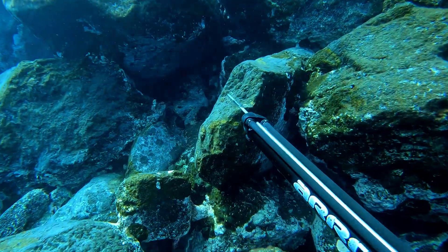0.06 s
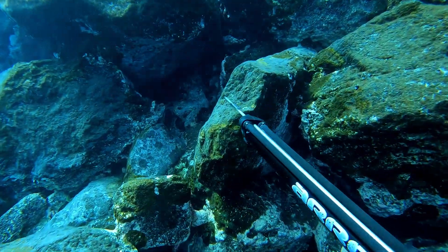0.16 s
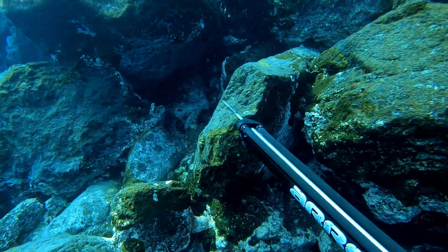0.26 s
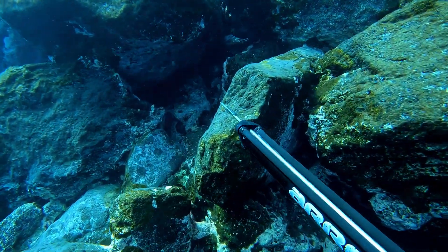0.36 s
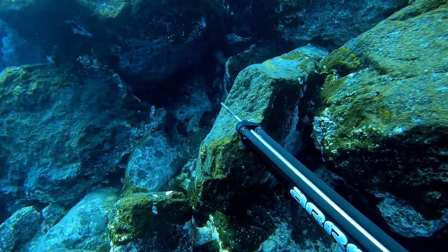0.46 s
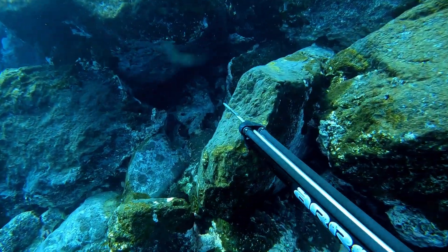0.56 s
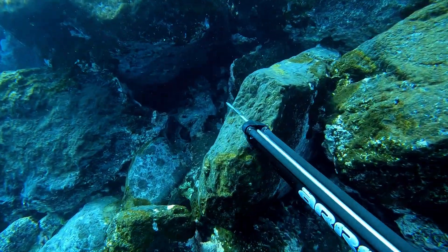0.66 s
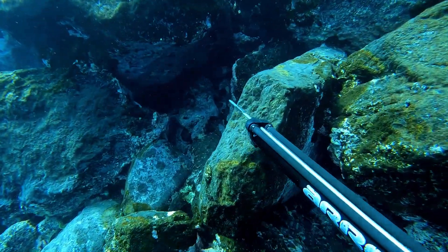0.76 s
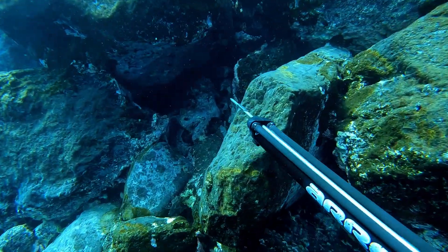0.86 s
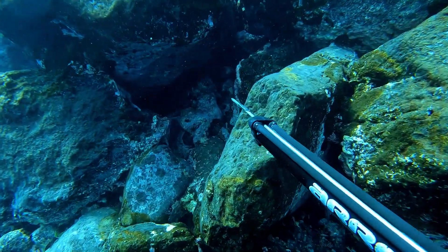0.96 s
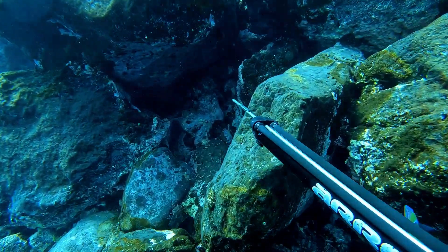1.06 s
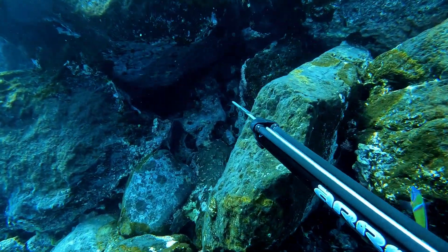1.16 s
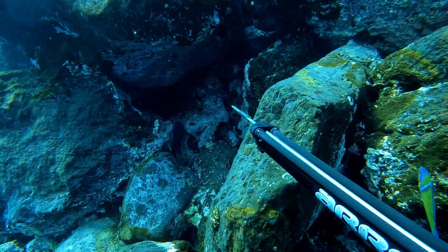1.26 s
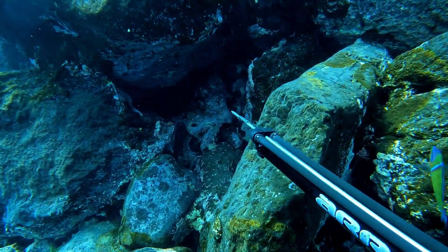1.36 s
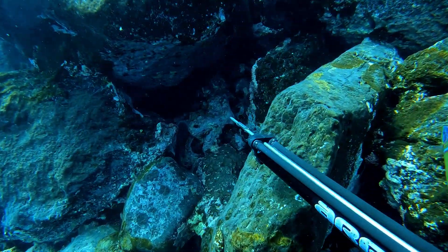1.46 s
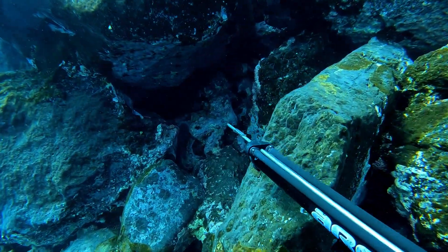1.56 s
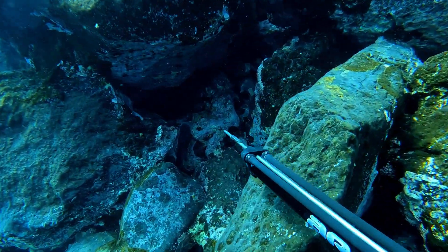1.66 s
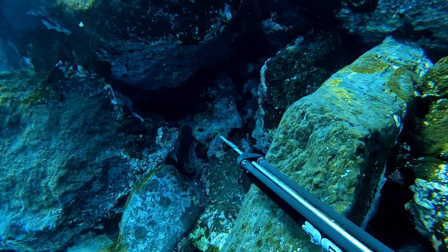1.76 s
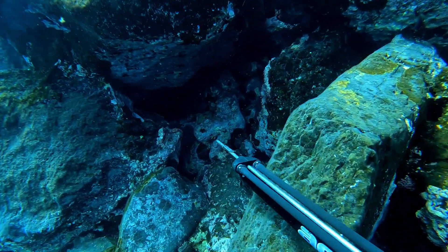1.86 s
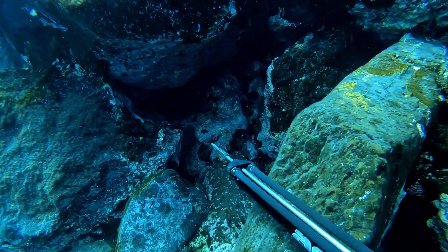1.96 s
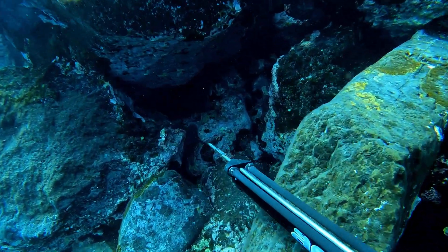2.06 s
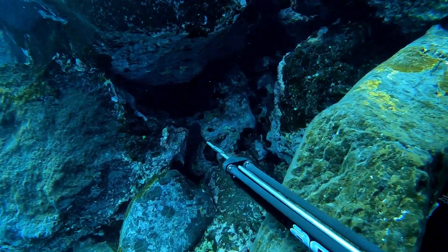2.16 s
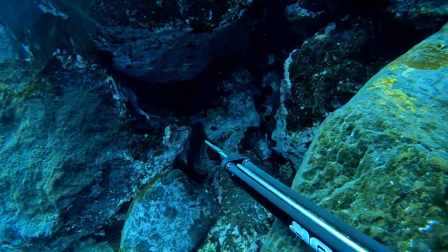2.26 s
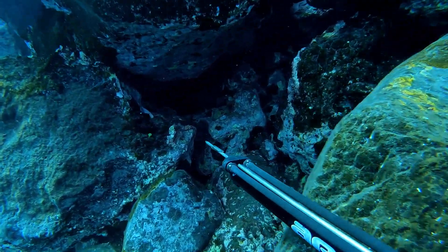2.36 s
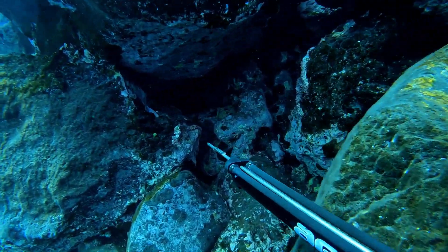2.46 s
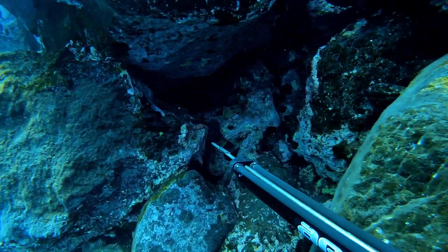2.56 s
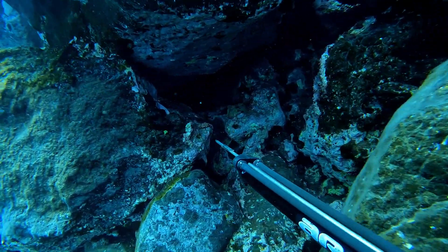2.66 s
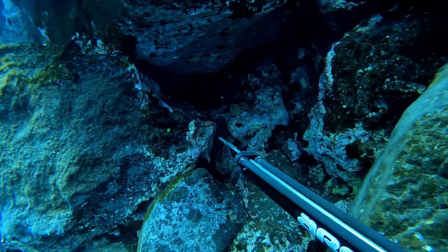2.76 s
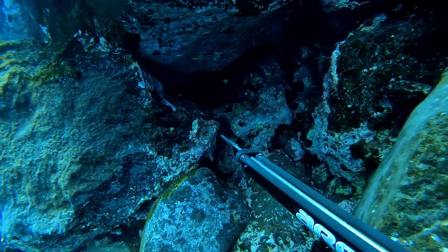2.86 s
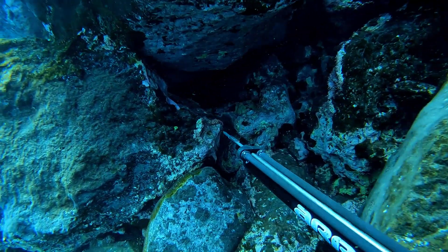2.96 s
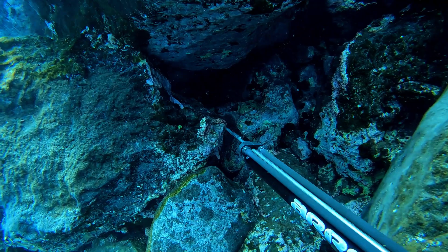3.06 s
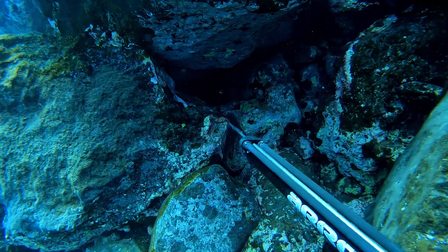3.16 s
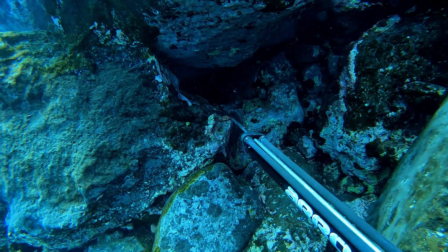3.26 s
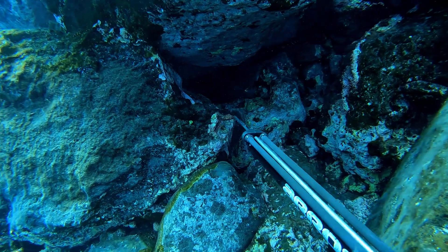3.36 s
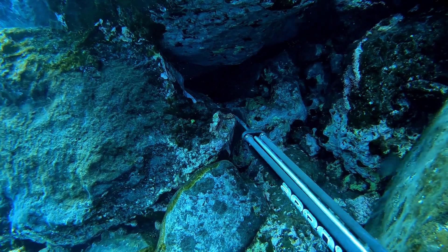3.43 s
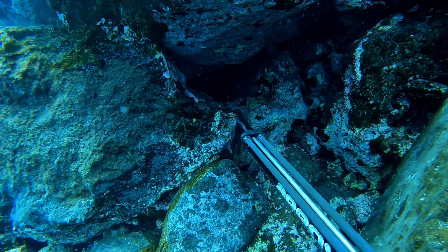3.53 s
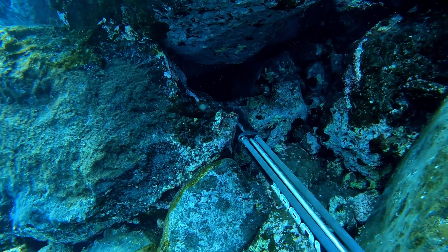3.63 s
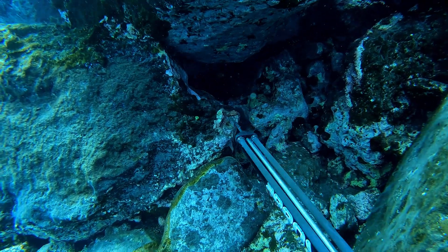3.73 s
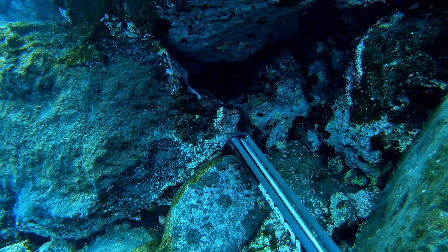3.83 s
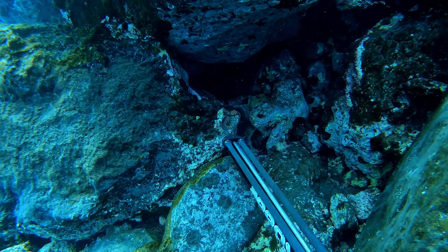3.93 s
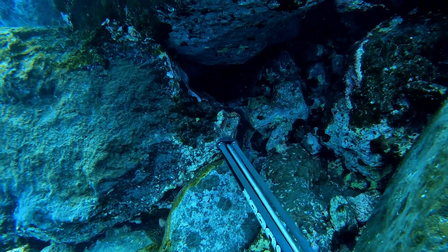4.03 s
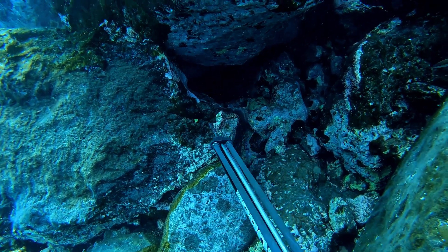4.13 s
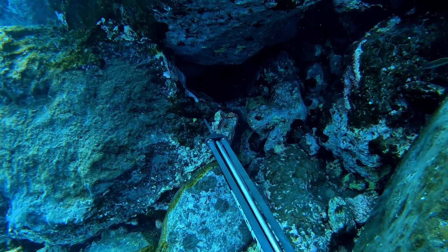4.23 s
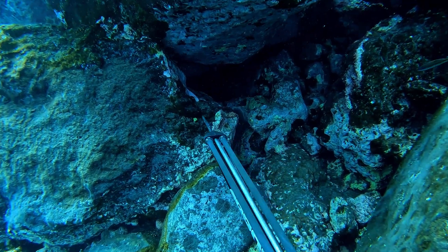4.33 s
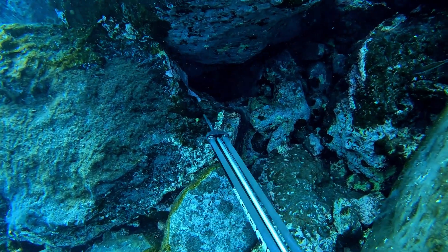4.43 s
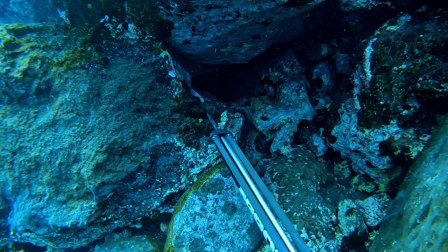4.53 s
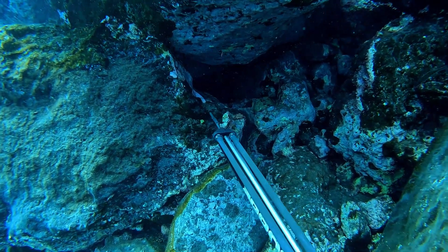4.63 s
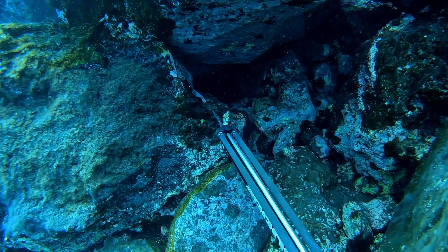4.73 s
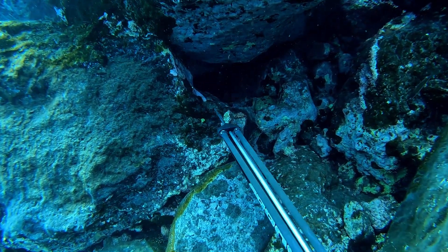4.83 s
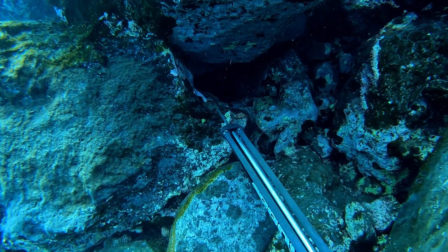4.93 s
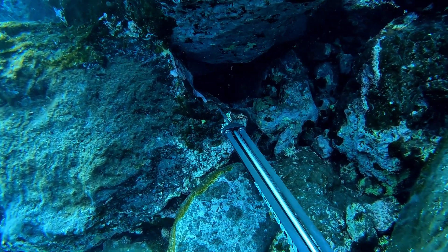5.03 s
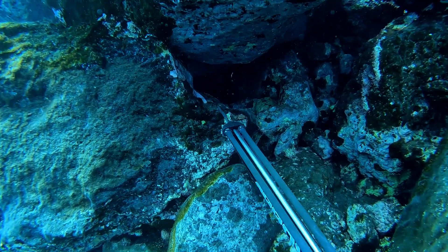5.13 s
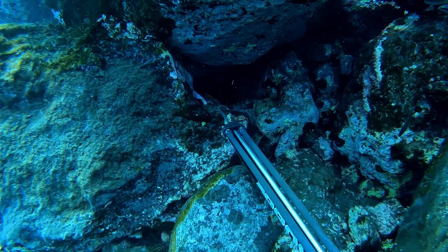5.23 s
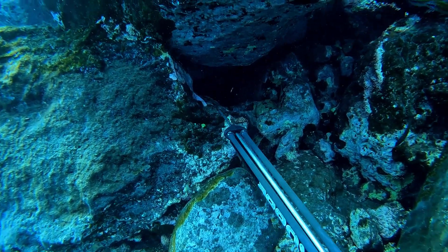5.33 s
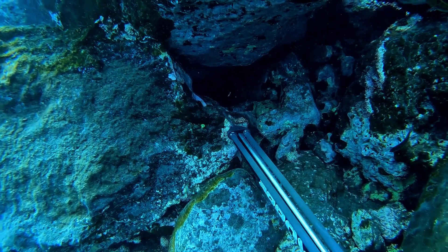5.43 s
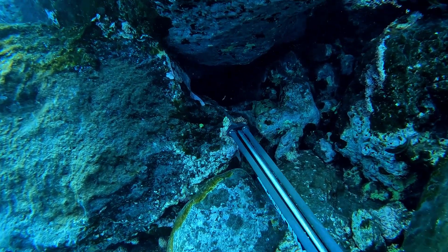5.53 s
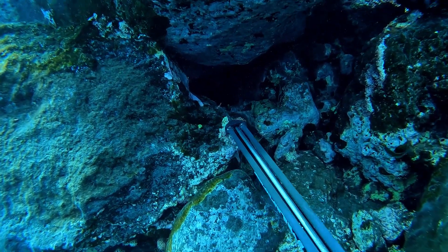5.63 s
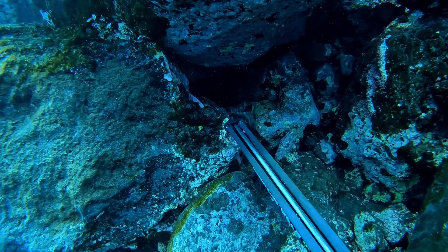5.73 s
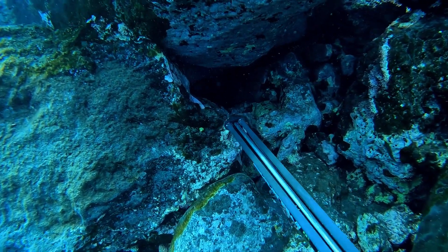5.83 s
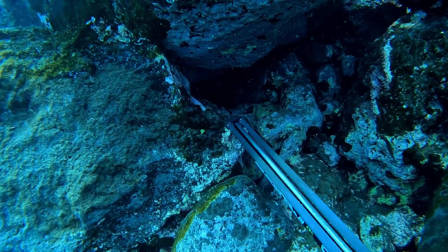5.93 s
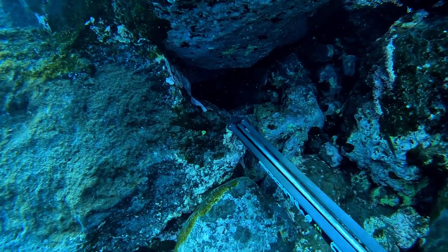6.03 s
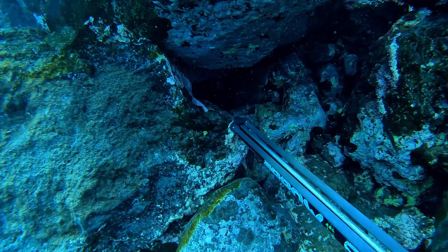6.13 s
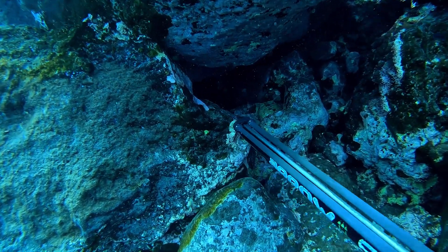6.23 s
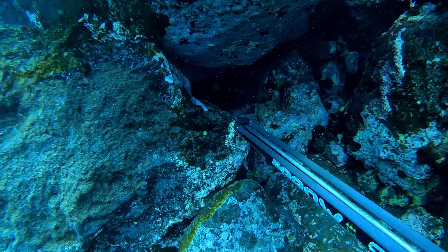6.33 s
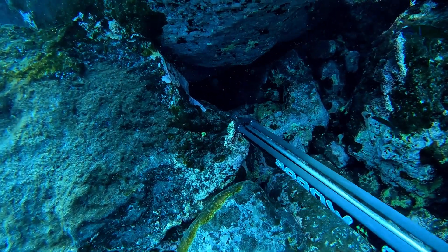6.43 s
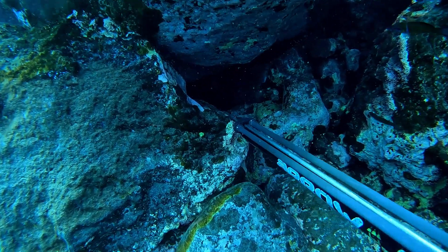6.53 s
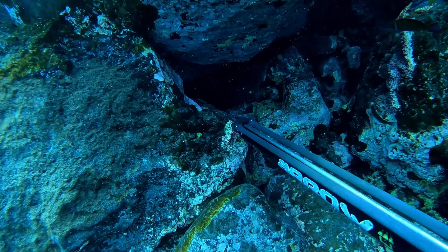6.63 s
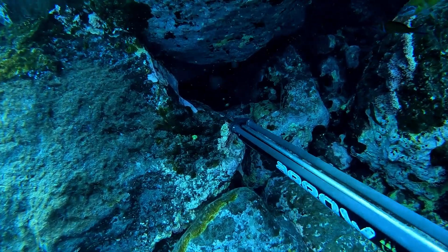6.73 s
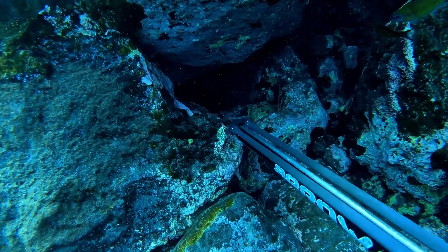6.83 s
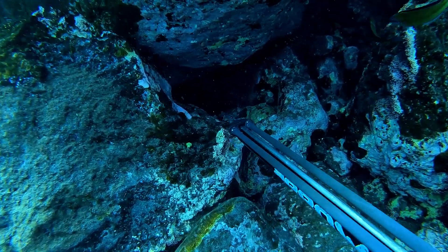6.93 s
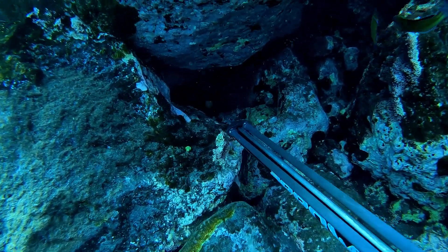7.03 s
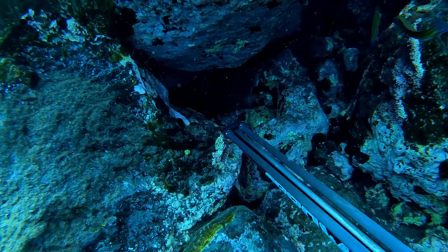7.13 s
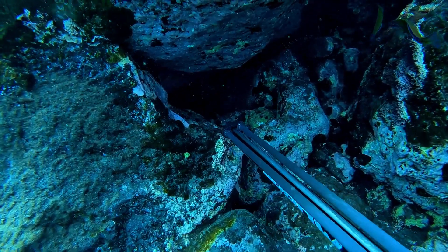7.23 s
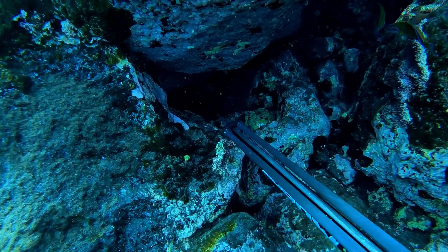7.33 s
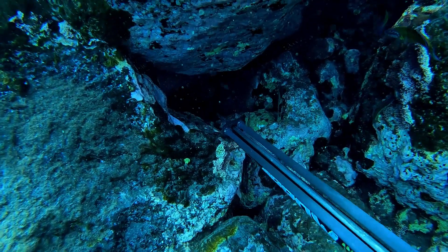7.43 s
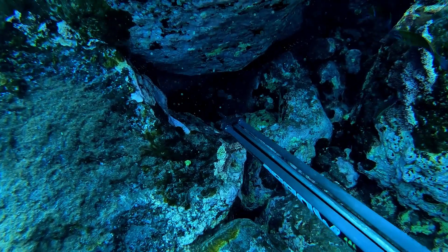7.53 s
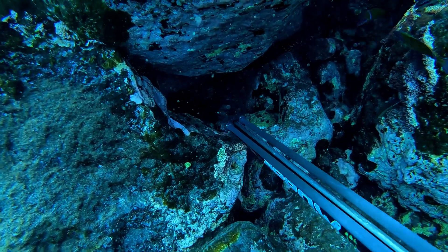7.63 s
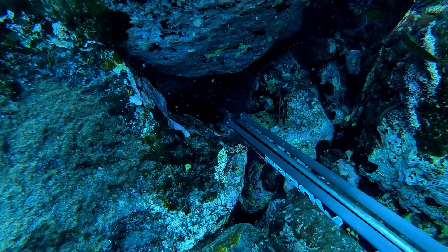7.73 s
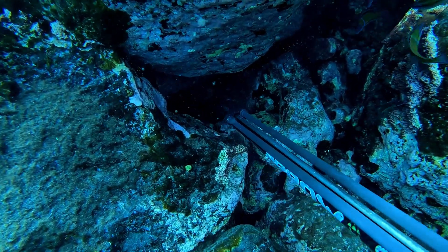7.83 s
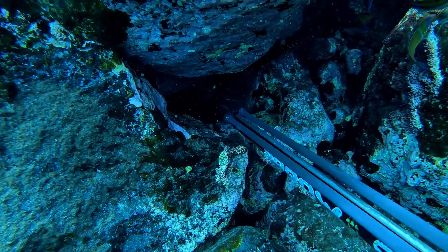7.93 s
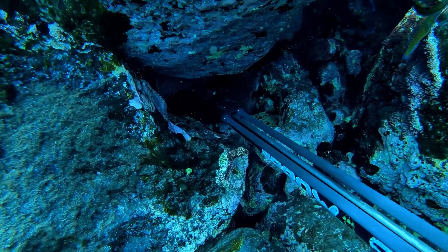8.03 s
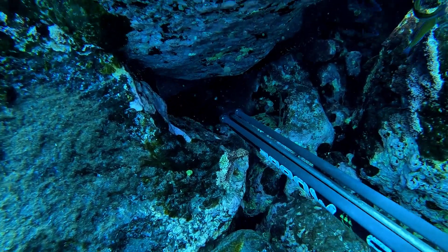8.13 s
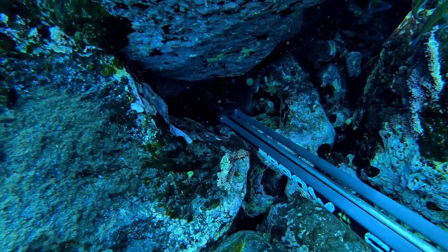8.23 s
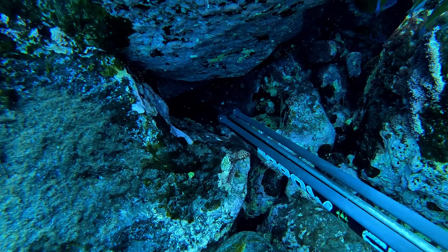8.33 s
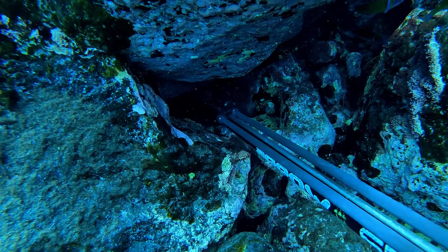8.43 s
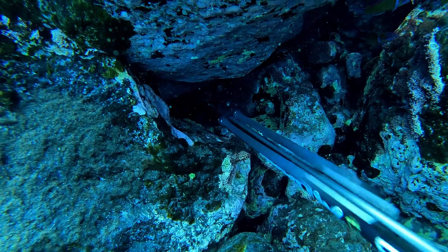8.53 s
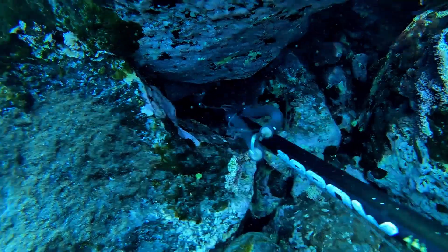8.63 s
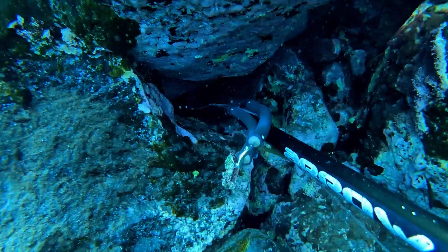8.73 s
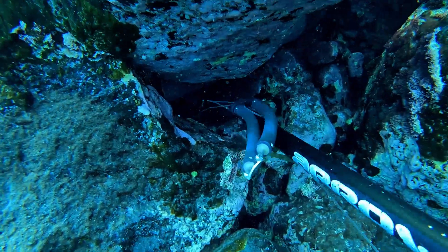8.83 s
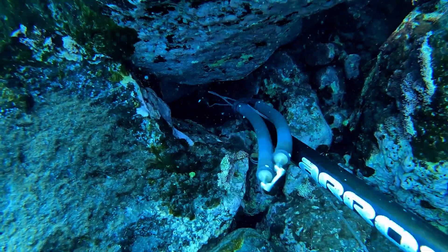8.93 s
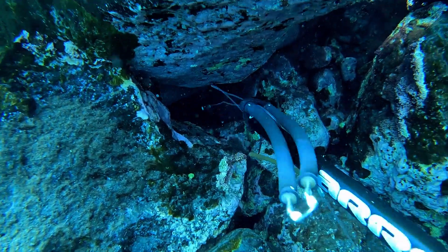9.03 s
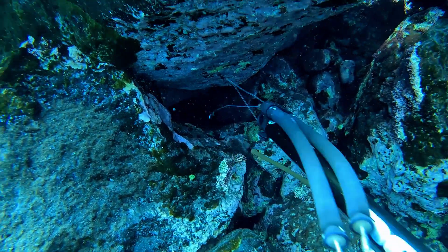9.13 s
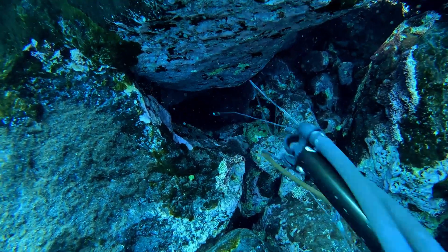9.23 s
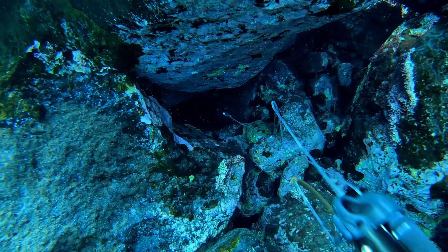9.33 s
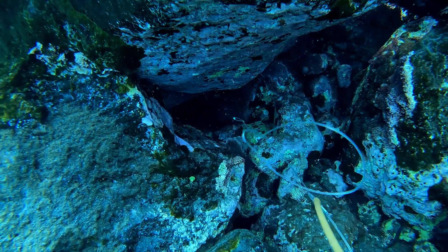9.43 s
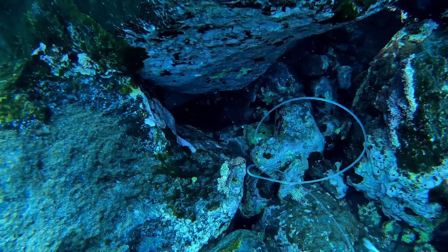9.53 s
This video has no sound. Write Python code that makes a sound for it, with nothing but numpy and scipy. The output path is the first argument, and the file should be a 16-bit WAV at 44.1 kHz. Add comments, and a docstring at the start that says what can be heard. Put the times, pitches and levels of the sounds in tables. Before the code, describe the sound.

Under water on a rocky reef, heard through a camera's sealed housing, snapping shrimp crackle constantly, hollow at first and then brighter. Low water surges, small gurgles and dull bumps come and go. Near the end a speargun fires: heavy thump, clacks and scrape, a short steel clink on rock, then a quick run of hollow tocks as the line jerks free.

```python
"""A speargun fires on a rocky reef, heard under water through a camera's dive housing: the shaft clacks and
scrapes out as noise bursts, steel rings on rock as decaying sines, and the line plucks the gun loop by loop.
Before and around it, snapping shrimp crackle as bursts of noise that ring the housing. Water surges and rubs
as coloured noise, bubbles gurgle as short rising sines, and soft bumps rock the housing."""
import sys
import numpy as np
from scipy import signal
from scipy.fft import rfft, irfft, next_fast_len
from scipy.io import wavfile
from scipy.ndimage import map_coordinates

SR = 44100
rng = np.random.default_rng(int(sys.argv[2]) if len(sys.argv) > 2 else 0)


def transcribe(u):
    """Save the signal u as a 16-bit wav file named by the first command-line argument.

    u: samples, shape (n,) or (channels, n), limited to [-1, 1]; the rate is SR.
    q: integer samples, one column per channel.
    """
    v = np.clip(np.atleast_2d(u).T, -1, 1)
    q = np.round(v * 32767).astype(np.int16)
    wavfile.write(sys.argv[1], SR, q)


N = 422478  # samples

# All levels in the tables are relative: each layer adds its own trim and colour.
# far crackle of the reef: start_s, level_db
FAR_CRACKLE = [(0.0, -60.5), (0.64, -61.5), (1.25, -55), (1.71, -63), (3.33, -52), (3.81, -54),
               (5.41, -49.5), (5.68, -51.5), (8.06, -49.5), (8.73, -52.5), (8.94, -57.5), (9.58, -56.5)]
# nearest shrimp snaps: start_s, level_db, body_db, treble_db
NEAR_SNAPS = [(0.0528, -47, 9, -9), (0.3604, -37, -9, -13), (0.464, -40.5, -6.5, -6.5),
              (0.6896, -41, -10, -5), (0.7474, -43.5, -12, -12), (0.9293, -36, -2.5, -9),
              (1.0622, -36.5, -8, -11), (1.15, -40, -13, -5), (1.156, -37.5, -9, -8),
              (1.3313, -39.5, -3.5, -1.5), (1.4597, -42.5, -5, -5), (1.96, -43.5, 3, -9),
              (2.0516, -41, -5, -4.5), (2.4474, -46, 4, 0.5), (2.593, -33.5, -5, -1),
              (2.6894, -27.5, -4.5, -1), (2.9726, -35, -3, -3.5), (3.2778, -37, -12, -11),
              (3.3523, -38.5, -4, -3), (3.4442, -35.5, -4, -3.5), (3.6293, -36.5, -10, -10),
              (3.8938, -39.5, -4, -4.5), (4.155, -40, -6, 2.5), (4.1853, -37.5, 2.5, -5),
              (4.4735, -39, -6, -3.5), (4.5155, -36, -6, -16), (4.6496, -30.5, -13, -9),
              (4.7723, -32.5, -4, 5), (4.886, -34.5, -8, -3.5), (4.9355, -35.5, 13, -7),
              (5.0856, -42.5, 0.5, 5), (5.144, -32, -13.5, -8), (5.2304, -37, 0, -16),
              (5.446, -41, -1, -1.5), (5.5347, -20.5, -3.5, -9), (5.9273, -30, -5, -3),
              (6.0687, -33.5, -13, -2.5), (6.0964, -39, 6, -5), (6.2972, -35, 0, -8),
              (6.4078, -34, -5.5, 0), (6.5297, -26, 9, -14), (6.8701, -32.5, -8.5, -12),
              (7.1071, -40, -1, 0), (7.2798, -34.5, -7, -3), (7.441, -34.5, -5, -7), (7.488, -33, -2, 2),
              (7.8677, -27, -12, -2), (8.068, -29.5, -6.5, -8), (8.208, -35.5, -2.5, -8),
              (8.382, -32.5, 3, -6)]
# crackle before the housing rings: freq_hz, level_db_per_hz
CRACKLE_SPECTRUM = [(300, -35), (520, -24.5), (750, -16.5), (980, -27.5), (1180, -3), (1750, 0.5),
                    (2020, -8.5), (2500, -2), (3500, -2.5), (5200, 0.5), (7400, -6.5), (8800, -16.5),
                    (12500, -19), (15500, -41)]
# smooth fizz of the farthest shrimp: freq_hz, level_db_per_hz
FIZZ_SPECTRUM = [(600, -17), (1400, 0.5), (3000, -3), (5300, -4.5), (7500, -4), (9000, -9), (12500, -15),
                 (15500, -30)]
# housing resonances: freq_hz, width_hz, boost_db
HOUSING_RINGS = [(850, 40, 0), (1129, 60, 6.5), (1374, 150, 4), (1552.5, 73, 10.5), (1660, 31, 3.5),
                 (1784, 39, 6.5), (2417, 144, 8), (2638, 62, 6), (3175, 38, 9), (3490, 35, 4.5),
                 (3830, 130, 4), (4490, 170, 5.5), (5255, 630, 7), (6470, 470, 6.5), (7450, 450, 5.5)]
# the reef sounds hollow at first, then opens up: start_s, hollowness (0-1)
HOLLOWNESS = [(0, 0.98), (1.55, 0.98), (2.0, 0.34), (2.6, 0.06), (9.58, 0)]
# the hollow colour: freq_hz, level_db
HOLLOW_COLOUR = [(600, 4), (1100, -1), (2200, 4.5), (3500, 4), (4100, 3), (5300, -10), (5800, -5.5),
                 (6500, -14), (7200, -9), (8700, 1), (10900, -8.5), (14000, 9)]
# water moving past the housing, drives swells and rubbing: start_s, strength_db
FLOW = [(0, -51), (1.0, -48), (1.7, -51), (2.7, -45.5), (3.8, -36.5), (4.6, -41), (5.6, -42), (6.65, -38),
        (6.9, -31), (7.2, -35.5), (8.55, -38.5), (9.42, -38), (9.58, -30.5)]
# pressure swells: freq_hz, level_db_per_hz
SWELL_SPECTRUM = [(4, -3), (12, 2.5), (28, -1), (45, -11), (70, -21), (140, -36.5), (300, -61), (600, -120)]
# rubbing on the housing: freq_hz, level_db_per_hz
RUB_SPECTRUM = [(40, -5.5), (90, 3), (160, 0), (230, -11.5), (340, -6.5), (480, -29), (750, -16),
                (1100, -38), (3000, -48)]
# the grip shifts and rubs: middle_s, half_length_s, level_db
GRIPS = [(0.95, 0.35, -60), (2.2, 0.2, -62), (3.8, 0.25, -53), (4.56, 0.1, -55), (5.1, 0.15, -57),
         (5.87, 0.05, -53), (6.98, 0.1, -54), (9.42, 0.04, -47)]
# gurgles, each a stream of small bubbles: start_s, length_s, level_db, pitch_hz (middle of the spread)
GURGLES = [(0.81, 0.07, -52, 850), (1.774, 0.04, -53, 780), (2.128, 0.03, -52, 705), (2.2, 0.03, -58, 760),
           (2.298, 0.03, -54, 800), (4.898, 0.068, -50, 750), (5.25, 0.45, -51, 790),
           (6.53, 0.03, -43, 1090), (8.823, 0.048, -43, 694)]
# small bubbles that pop against the housing: start_s, level_db
POPS = [(0.862, -35.5), (1.969, -32.5), (2.802, -36.5), (4.785, -33.5), (7.556, -18), (7.712, -35.5),
        (8.085, -22)]
# soft bumps on the housing: middle_s, level_db, pitch_hz
BUMPS = [(0.864, -35.5, 420), (2.461, -46.5, 423), (3.739, -34, 149), (3.81, -28, 90), (3.939, -26, 125),
         (3.967, -20.5, 170), (4.199, -30, 125), (4.24, -24.5, 132), (4.332, -24.5, 105), (4.373, -45, 320),
         (4.613, -14.5, 130), (5.879, -46, 330), (6.906, -28, 55.6), (8.666, -16, 160), (8.678, -8.5, 37.8),
         (8.696, -13.5, 315), (8.705, -13.5, 150), (8.745, -19, 66), (8.86, -22, 31), (8.968, -27.5, 330),
         (8.972, -23.5, 132)]
# shaft and gear clack against the gun: start_s, level_db, body_db, treble_db
CLACKS = [(8.643, -31, -1, 1), (8.657, -12.5, -0.5, 4), (8.665, -11, -0.5, 4.5), (8.675, -15.5, -3, 4),
          (8.699, -20.5, 8.5, 3.5), (8.743, -31, -16, 13.5), (8.9092, -23.5, 2, 1.5),
          (8.933, -27, -2.5, 0.5), (9.347, -38, 3.5, 5.5)]
# shaft slides out along the barrel, later the line drags: start_s, level_db, t60_s, body_db, treble_db
SCRAPES = [(8.678, -21, 0.17, 3, 1), (8.70, -27, 0.15, 7, 1), (9.356, -46, 0.33, 10, -5)]
# rattle of the gear and of steel on rock: freq_hz, level_db_per_hz
RATTLE_SPECTRUM = [(260, -33), (470, -28), (620, -8.5), (830, -11.5), (1000, -21), (1120, -9), (1590, 1),
                   (1820, -9), (2020, -16.5), (2670, -4.5), (2950, -7.5), (4500, -11.5), (7700, -19),
                   (9000, -30.5), (13000, -40.5), (15600, -67)]
# low push of the shot: freq_hz, level_db_per_hz
RECOIL_SPECTRUM = [(15, -13), (35, 4.5), (65, 1.5), (140, -3), (220, -20), (350, -15), (470, -36),
                   (1200, -72)]
# ring modes of the spear: pitch_hz, level_db, t60_s (before the stretch in spear)
STEEL_MODES = [(807, 1, 0.035), (1200, -3, 0.047), (1630, -8, 0.07), (1790, -4.5, 0.053), (2720, -1, 0.043),
               (4565, -5.5, 0.028), (5470, -14, 0.026), (8070, -29, 0.04), (10780, -35, 0.039),
               (13390, -34, 0.038)]
# line jerks off its release, one loop at a time: start_s, level_db
LINE_LOOPS = [(9.044, -26), (9.1283, -21.5), (9.2111, -18.5), (9.3011, -18.5), (9.4046, -30.5)]
# modes of the plucked gun: pitch_hz (before detuning), level_db, t60_s, delay_s
GUN_MODES = [(660, -11, 0.045, 0.0014), (790, -1, 0.027, 0), (1270, 0, 0.018, 0.0013),
             (1443, 1, 0.017, 0.00044), (1606, -15, 0.024, 0.014), (117.3, 2.5, 0.093, .007),
             (240.6, -9.5, 0.059, 0.000014), (317, -18, 0.078, 0)]
# likeness of left and right: freq_hz, correlation (0-1)
STEREO_LIKENESS = [(100, 0.992), (500, 0.85), (1000, 0.82), (2000, 0.93), (4000, 0.7), (8000, 0.82),
                   (13000, 0.25)]
# level tilt between the two ports: freq_hz, left_minus_right_db
PORT_TILT = [(200, -0.5), (550, 1), (1200, -3.5), (1600, -0.5), (2400, 6), (3200, 6), (4000, 1.5),
             (5000, -2.5), (6500, -2), (9000, 2.5), (13000, 0)]
# phase tilt between the two ports: freq_hz, left_lead_rad
PORT_LEAD = [(150, -0.013), (350, -0.25), (750, -0.82), (1500, -0.5), (2240, -1.05), (3400, -1.31),
             (4300, -0.88), (5600, 0.15), (6300, -0.043), (11000, 0.83), (15000, 1.9)]
# the stereo image narrows almost to mono early on, then opens: start_s, width (0-1)
STEREO_WIDTH = [(0.0, 0.45), (0.35, 0.005), (1.48, 0.005), (1.68, 1)]

# the high part of a far snap is shorter than its low part: low_hz, high_hz, t60_s
FAR_SNAP_BANDS = [(0, 2000, .035), (2000, 4300, .02), (4300, 8200, .012), (8200, SR / 2, .012)]
# resonances in the gear rattle: freq_hz, width_hz, boost_db
RATTLE_RINGS = [(815, 70, 3.6), (1200, 80, 4), (1583, 53, 4), (1800, 70, 5.2), (2650, 98, 4.1),
                (5300, 210, 2.4), (7730, 590, 4.2)]
# slap of a loop of line: freq_hz, level_db_per_hz
SLAP_SPECTRUM = [(300, -17), (500, -18), (750, 6.5), (1000, -3.5), (1300, 2), (1650, 5),
                 (2000, -20.5), (5000, -20.5), (12000, -43)]
# shudder of the barrel: freq_hz, level_db_per_hz
SHUDDER_SPECTRUM = [(40, -8.5), (140, 4.5), (220, -5), (350, -1.5), (460, -35), (1000, -56)]

TOP_HZ, WIDE_ABOVE_HZ = 15800, 8500  # band limit; the treble above the second stays wide
RESTLESS_DB = 1.0  # small random flurries in the far crackle and fizz
HOLLOW_DB = 1.0  # extra level of the hollow colour
SNAP_T60_S, SNAP_REF_DB = 0.05, -35  # decay of a snap at this level with neutral body
# decay doubles when a snap is this much fainter (farther), or this much fuller in body
SMEAR_DOUBLES_DB, BODY_DOUBLES_DB = 16.5, 23
RUB_DB, RUB_GROWS = -60, 0.4  # rubbing at the mean flow; its dB for each dB of flow
FIRE_S = 8.657  # the trigger is pulled
WAKE_RISE_S, WAKE_T60_S, WAKE_DB = 0.04, 0.85, -15.5  # the swell that the shot leaves behind
CHURN_T60_S, CHURN_DB = 3.5, -41  # the gun goes on rubbing in the hand after the shot
BUBBLES_PER_S = 170
BUMP_S, BUMP_CYCLES = 0.003, 0.43  # half length of a bump: contact time plus this share of a cycle
CLACK_T60_S = 0.045


def amp(db):
    """Decibels to gain."""
    return 10 ** (np.asarray(db) / 20)


def unit(x):
    """Scale to rms 1."""
    return x / np.sqrt(np.mean(x ** 2) + 1e-20)


def along(points, hz):
    """Read a curve of (Hz, value) points on a log frequency axis."""
    f, v = np.transpose(points)
    return np.interp(np.log(hz + 1), np.log(f + 1), v)


def curves(rows):
    """Automation: one value per sample for each column after the time."""
    s, *columns = np.transpose(rows)
    return [np.interp(np.arange(N) / SR, s, column) for column in columns]


def wobble(rate):
    """A smooth random curve with rate knots a second."""
    knots = rng.standard_normal(int(N * rate / SR) + 4)
    return map_coordinates(knots, [np.arange(N) * rate / SR])


def fade(t, t60):
    """Exponential decay by 60 dB in t60."""
    return np.exp(-np.log(1000) * t / t60)


def add(track, s, sound):
    """Mix a sound into a track at time s."""
    part = track[..., max(round(s * SR), 0):][..., :sound.shape[-1]]
    part += sound[..., :part.shape[-1]]


def filtered(x, response):
    """Shape x by a complex response of frequency."""
    n = x.shape[-1]
    m = 2 * next_fast_len(n // 2 + 2048)  # even length, padded
    return irfft(rfft(x, m) * response(np.fft.rfftfreq(m, 1 / SR)), m)[..., :n]


def colour(x, spectrum, peaks=()):
    """Causal (minimum-phase) filter of unit energy from a spectrum and resonances."""
    def response(hz):
        level = along(spectrum, hz)
        level = level + sum(db / (1 + (2 * (hz - f) / width) ** 2) for f, width, db in peaks)
        # folding the cepstrum forward in time makes the filter causal
        cepstrum = irfft(np.log(unit(amp(level)) + 1e-6))
        half = len(cepstrum) // 2
        return np.exp(rfft(np.r_[cepstrum[0], 2 * cepstrum[1:half], np.zeros(half)]))
    return filtered(x, response)


def tinted(x, body_db, treble_db):
    """Body and treble shelves on each side of 3 kHz."""
    shelves = [(1700, body_db), (2600, 0), (3600, 0), (5500, treble_db)]
    return filtered(x, lambda hz: amp(along(shelves, hz)))


def scatter(t, t60, tail_db, tail_t60):
    """Envelope of a snap: the first arrivals, then fainter echoes from the rocks."""
    return (1 - np.exp(-t / 0.001)) * np.hypot(fade(t, t60), amp(tail_db) * fade(t, tail_t60))


def rough(t, depth_db, rate=650):
    """Two noises that come in the same uneven clumps, as sound does over many short paths."""
    clumps = map_coordinates(rng.standard_normal(int(t[-1] * rate) + 4), [t * rate])
    return unit(amp(depth_db * np.tanh(clumps / 2) * 2)) * rng.standard_normal((2, len(t)))


def far_snaps(uneven_db=5.0):
    """Countless snaps merge into a swarm, each with its own share of every frequency band."""
    t = np.arange(SR // 6) / SR
    when, size = rng.random((2, 2400))
    heard = np.arange(len(when)) < 150 * N / SR  # 150 snaps a second
    power = heard * (size + .025) ** -1.2  # few loud, many faint
    out = np.zeros((2, N))
    for lo, hi, t60 in FAR_SNAP_BANDS:
        share_db = uneven_db * np.clip(rng.standard_normal(len(when)), -2, 1.5)
        strikes = np.bincount((when * N).astype(int), power * amp(share_db) ** 2, N)
        echo = (1 - np.exp(-t / 0.00049)) * scatter(t, t60, tail_db=-20.0, tail_t60=0.21)
        swarm_power = signal.fftconvolve(strikes, echo ** 2)[:N]
        swarm = unit(np.sqrt(np.abs(swarm_power)))
        band = filtered(rng.standard_normal((2, N)), lambda hz: (hz > lo) & (hz < hi))
        out += np.hypot(amp(-10.5), swarm) * band  # a steady floor under the swarm
    return out


def near_snaps(click_top_db=6):
    """A sharp click, then clumps of echoes; the path over the rocks gives each its own ripple of colour."""
    out, t = np.zeros((2, N)), np.arange(SR // 6) / SR
    ripple_hz = np.geomspace(1000, 16000, 44)
    margin = SR // 200  # room for the filters to ring ahead of the click
    for s, db, body_db, treble_db in NEAR_SNAPS:
        doublings = (SNAP_REF_DB - db) / SMEAR_DOUBLES_DB + body_db / BODY_DOUBLES_DB
        t60 = SNAP_T60_S * 2 ** doublings
        echoes = scatter(t, t60, tail_db=-16, tail_t60=0.16) * rough(t, depth_db=3.5)
        click = amp(2) * fade(t, 0.0054) * rng.standard_normal((2, len(t)))
        click = filtered(click, lambda hz: amp(along([(7000, 0), (12000, click_top_db)], hz)))
        ripple = np.c_[ripple_hz, 3 * rng.standard_normal(len(ripple_hz))]
        burst = tinted(np.pad(click + echoes, ((0, 0), (margin, 0))), body_db, treble_db)
        add(out, s - margin / SR, amp(db) * filtered(burst, lambda hz: amp(along(ripple, hz))))
    return amp(5) * out


def shrimp():
    """Near and far snaps ring the housing; the farthest merge into a smooth fizz."""
    far_db = curves(FAR_CRACKLE)[0] + RESTLESS_DB * wobble(12)
    hollowness = np.clip(curves(HOLLOWNESS)[0], 0, 1)
    snaps = amp(far_db + 2.5) * far_snaps() + near_snaps()
    crackle = colour(snaps, CRACKLE_SPECTRUM, HOUSING_RINGS)
    fizz = amp(far_db - 6) * colour(rng.standard_normal((2, N)), FIZZ_SPECTRUM)
    reef = crackle + fizz
    hollow = filtered(reef, lambda hz: amp(HOLLOW_DB + along(HOLLOW_COLOUR, hz)))
    reef = (1 - hollowness) * reef + hollowness * hollow
    return reef + amp(-75) * rng.standard_normal((2, N))  # a faint even hiss


def swells(flow_db, since, stirred):
    """The flow, and the wake of the shot, drive slow pressure swells of low noise."""
    wake = amp(WAKE_DB) * stirred * fade(since, WAKE_T60_S)
    size = np.hypot(amp(flow_db + 2.0), wake)
    return size * unit(colour(rng.standard_normal((2, N)), SWELL_SPECTRUM))


def rubbing(flow_db, since, stirred):
    """Flow, the stirred-up gun and a shifting grip rub the housing: lumpy noise, powers summed."""
    t = np.arange(N) / SR
    rubs = [amp(RUB_DB + RUB_GROWS * (flow_db - flow_db.mean()))]
    rubs += [amp(CHURN_DB) * stirred * fade(since, CHURN_T60_S)]
    rubs += [amp(db) * np.exp(-.5 * ((t - s) / length) ** 2) for s, length, db in GRIPS]
    lumps = amp(4.5 * wobble(35))
    noise = unit(colour(lumps * rng.standard_normal((2, N)), RUB_SPECTRUM))
    return np.linalg.norm(rubs, axis=0) * noise


def surge():
    """Moving water swells and rubs; the shot stirs up both."""
    flow_db, = curves(FLOW)
    since = np.maximum(np.arange(N) / SR - FIRE_S, 0)
    stirred = 1 - np.exp(-since / WAKE_RISE_S)
    return swells(flow_db, since, stirred) + rubbing(flow_db, since, stirred)


def gurgles(spread=0.15, uneven_db=5.2, life_cycles=13):
    """A gurgle swells and ebbs; each bubble rings for only a few cycles, rising slightly."""
    out, t = np.zeros(N), np.arange(SR // 12) / SR
    for s, length, db, hz in GURGLES:
        count = length * BUBBLES_PER_S
        chance = rng.standard_normal((256, 3))
        for turn, (pitch, size, shift) in enumerate(chance[:int(count)]):
            swell = np.sqrt(np.sin(np.pi * (turn + .5) / count))
            cycles = hz * np.exp(spread * pitch) * t * (1 + 2.3 * t)
            bubble = np.sin(2 * np.pi * cycles) * (1 - np.exp(-cycles)) * fade(cycles, life_cycles)
            level = amp(db + uneven_db * size + 3) * swell
            add(out, s + (turn + .5 * shift) / BUBBLES_PER_S, level * bubble)
    return out


def big_bubble(start_s=7.243, level_db=-39, hz=1350, attack_s=0.006, t60=0.15, waver=0.1):
    """One larger bubble rings with a wavering pitch."""
    out, t = np.zeros(N), np.arange(SR // 5) / SR
    cycles = hz * t + waver * wobble(250)[:len(t)]
    envelope = (1 - np.exp(-t / attack_s)) * fade(t, t60)
    add(out, start_s, amp(level_db + 5) * np.sin(2 * np.pi * cycles) * envelope)
    return out


def bumps(overtone_hz=320, overtone_db=-18, waver=0.04):
    """A soft contact rocks the housing unevenly, wakes its low ring and rubs it a little before and after."""
    t = np.arange(-SR // 10, SR // 10) / SR
    out, scuff = np.zeros((2, N))

    def swing(hz):
        """A short sine, its phase drifting, that swells and ebbs about the contact."""
        drift = map_coordinates(rng.standard_normal(128), [(t - t[0]) * hz])
        length = BUMP_S + BUMP_CYCLES / hz
        return np.sin(2 * np.pi * (hz * t + waver * drift)) / np.cosh(1.74 * t / length)
    for s, db, hz in BUMPS:
        add(out, s + t[0], amp(db) * (swing(hz) + amp(overtone_db) * swing(overtone_hz)))
        add(scuff, s + t[0], amp(db - 27) / np.cosh(t / 0.018) * rng.standard_normal(len(t)))
    return out + colour(scuff, RUB_SPECTRUM)


def bubble_pops(start_hz=2300, end_hz=115, glide_s=0.00056):
    """Each pop is one quick swing whose pitch dives from a tick to a thud."""
    out, t = np.zeros(N), np.arange(SR // 20) / SR
    cycles = end_hz * t + (start_hz - end_hz) * glide_s * (1 - np.exp(-t / glide_s))
    pop = np.sin(2 * np.pi * cycles) * (1 - np.exp(-t / 0.0021)) * np.exp(-(t / 0.0056) ** 2)
    for s, db in POPS:
        add(out, s, amp(db + 4.5) * pop)
    return out


def line():
    """Each loop of line plucks the gun: a slap and a hollow tock, then the low shudder of the barrel."""
    t = np.arange(SR // 5) / SR
    tocks, slaps, shudder = np.zeros((3, N))
    for s, db in LINE_LOOPS:
        slap = scatter(t, t60=0.015, tail_db=-13.5, tail_t60=0.1) * rng.standard_normal(len(t))
        add(slaps, s, amp(db - 1.5) * slap)
        shake = (1 - np.exp(-t / 0.0034)) * fade(t, 0.1) * rng.standard_normal(len(t))
        add(shudder, s + 0.0086, amp(0.34 * db - 20.5) * shake)  # varies less than the slap
        for hz, level_db, t60, delay in GUN_MODES:
            detune, size, phase = rng.standard_normal(3)
            pitch = hz * (1 + .03 * detune)
            attack = 1 - np.exp(-(t * hz / 1.17) ** 2)
            mode = np.sin(2 * np.pi * (pitch * t + phase)) * fade(t, t60) * attack
            add(tocks, s + delay, amp(db + level_db + 2.5 + 1.7 * size) * mode)
    return tocks + colour(slaps, SLAP_SPECTRUM) + colour(shudder, SHUDDER_SPECTRUM)


def spear(hit_s=8.7905):
    """Steel strikes rock: a burst of rattle and a chord of modes that the water soon damps."""
    out, t = np.zeros((2, N)), np.arange(SR // 5) / SR
    ring = 0
    for hz, db, t60 in STEEL_MODES:
        ring = ring + amp(db) * np.sin(2 * np.pi * (hz * t + rng.random())) * fade(t, 1.28 * t60)
    add(out, hit_s, amp(-21) * fade(t, 0.045) * rough(t, depth_db=7, rate=400))
    out = colour(out, RATTLE_SPECTRUM)
    add(out[0], hit_s, amp(-20) * (1 - np.exp(-t / 0.00078)) * ring)
    return out


def gear_rattle(t):
    """Shaft and gear clack, shaft and line scrape: clumped noise through the rattle resonances."""
    rattle = np.zeros((2, N))
    for s, db, body_db, treble_db in CLACKS:
        envelope = scatter(t, CLACK_T60_S, tail_db=-24.5, tail_t60=0.29)
        clack = envelope * rough(t, depth_db=4.0, rate=388)
        add(rattle, s, amp(db) * tinted(clack, body_db, treble_db))
    for s, db, t60, body_db, treble_db in SCRAPES:
        scrape = fade(t, t60) * rough(t, depth_db=6.5, rate=260)
        add(rattle, s, amp(db) * tinted(scrape, body_db, treble_db))
    return colour(rattle, RATTLE_SPECTRUM, RATTLE_RINGS)


def band_release(t):
    """The bands let go: a heavy push of low noise and a knock, a short decaying sine."""
    push, knock = np.zeros((2, 2, N))
    push_envelope = (1 - np.exp(-t / 0.0024)) * fade(t, 0.3)
    add(push, FIRE_S, amp(-11) * push_envelope * rng.standard_normal((2, len(t))))
    knock_envelope = (1 - np.exp(-t / 0.001)) * fade(t, 0.027)
    add(knock[0], FIRE_S + 0.0012, amp(-5.5) * np.sin(2 * np.pi * 770 * t) * knock_envelope)
    return colour(push, RECOIL_SPECTRUM) + knock


def shot():
    """The bands let go while the shaft clacks and scrapes out along the barrel."""
    t = np.arange(SR // 2) / SR
    return gear_rattle(t) + band_release(t)


def ports(pair):
    """Two unrelated signals become left and right: alike in the bass, shifted in level and phase above."""
    def mixing(hz):
        turn = np.arccos(np.clip(along(STEREO_LIKENESS, hz), 0, 1)) / 2
        return np.array([np.cos(turn), np.sin(turn)])
    mid, side = filtered(pair, mixing)
    sign = np.array([[.5], [-.5]])  # half of each tilt to either side

    def tilt(hz):
        return amp(sign * along(PORT_TILT, hz)) * np.exp(1j * sign * along(PORT_LEAD, hz))
    return filtered(np.array([mid + side, mid - side]), tilt)


def scene():
    """The reef, plus all that shakes the housing from close by, with the stereo width applied last."""
    water = shrimp() + surge() + shot() + spear()
    water[0] += line() + gurgles() + big_bubble() + bumps() + bubble_pops()
    left, right = ports(water)
    mid, side = (left + right) / 2, (left - right) / 2
    top = filtered(side, lambda hz: 1 - 1 / (1 + (hz / WIDE_ABOVE_HZ) ** 10))
    side = top + np.clip(curves(STEREO_WIDTH)[0], 0, 1) * (side - top)
    return np.array([mid + side, mid - side])


def record(dry):
    """The camera rounds off the highest peaks and keeps nothing above its band limit."""
    limited = dry / (1 + np.abs(dry) ** 6) ** (1 / 6)
    return filtered(limited, lambda hz: hz < TOP_HZ)


dry = scene()
out = record(dry)
transcribe(out)
```